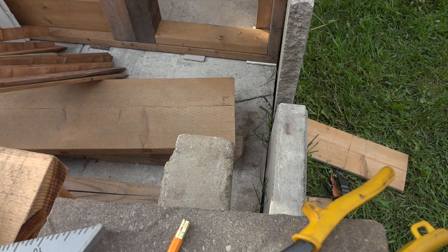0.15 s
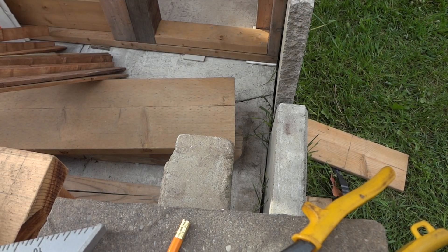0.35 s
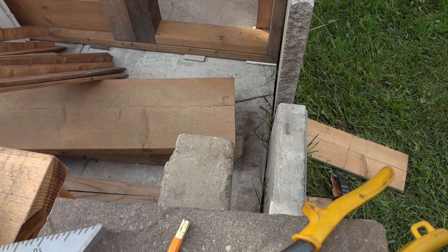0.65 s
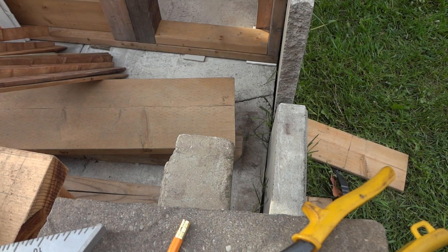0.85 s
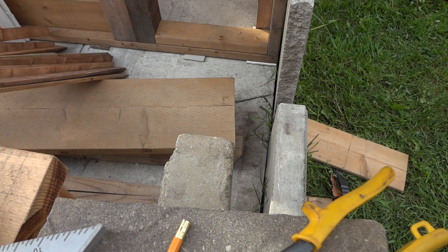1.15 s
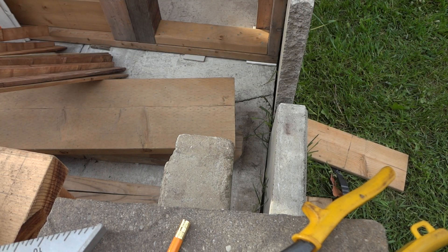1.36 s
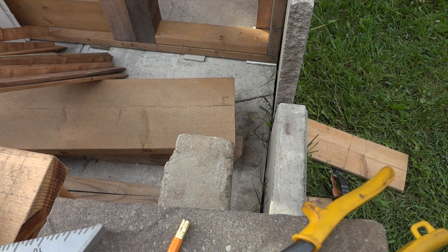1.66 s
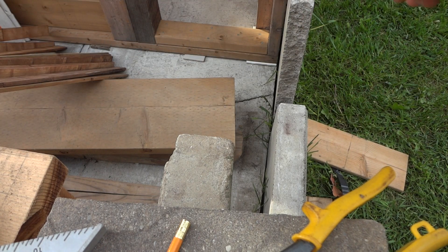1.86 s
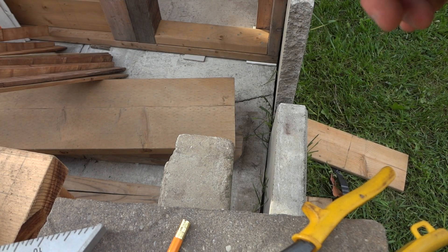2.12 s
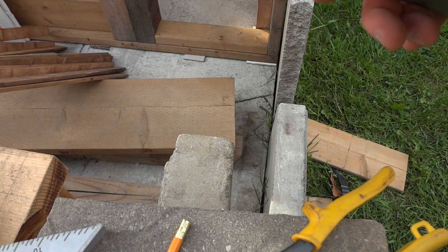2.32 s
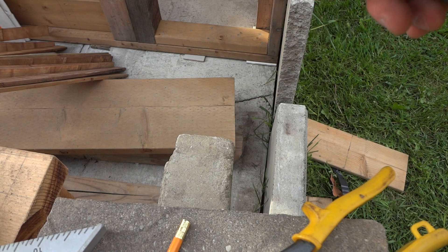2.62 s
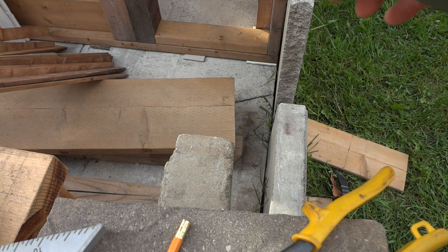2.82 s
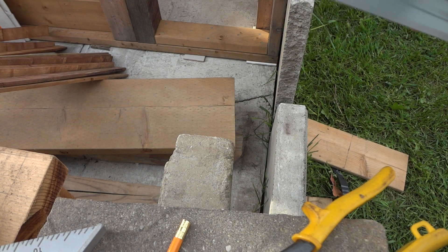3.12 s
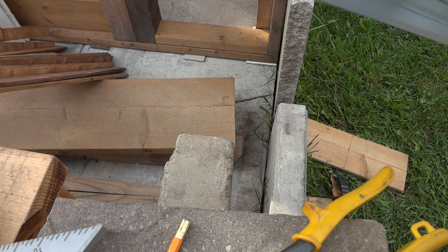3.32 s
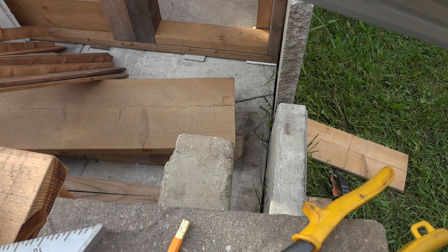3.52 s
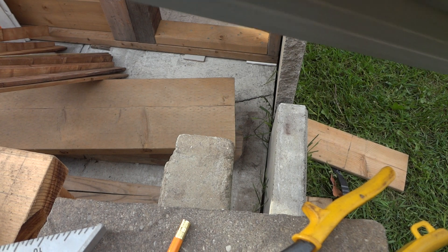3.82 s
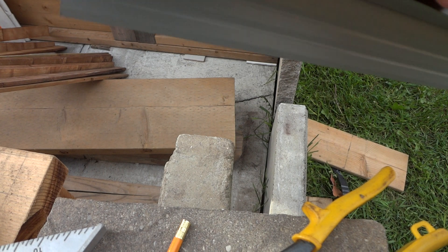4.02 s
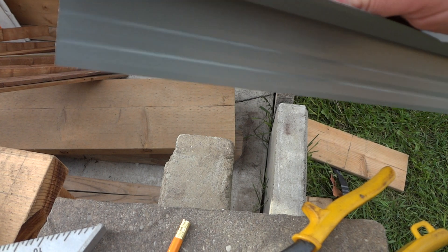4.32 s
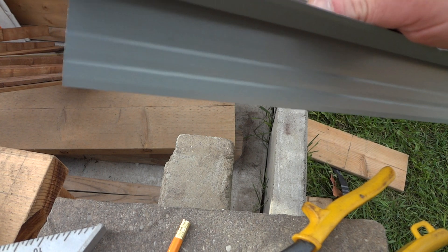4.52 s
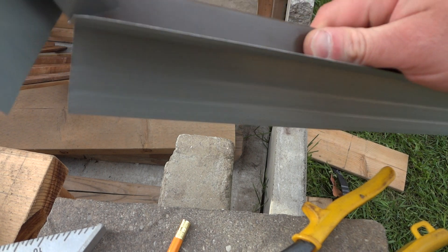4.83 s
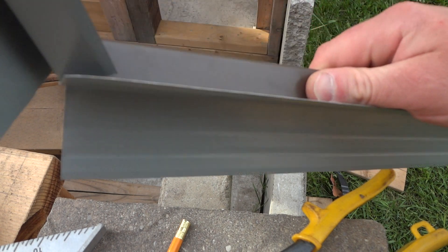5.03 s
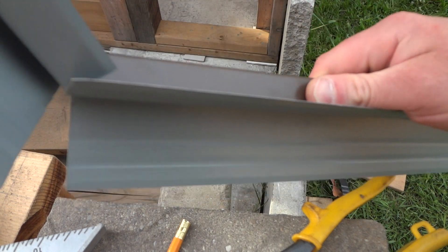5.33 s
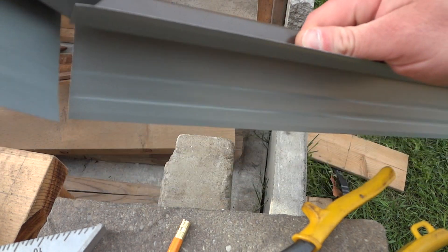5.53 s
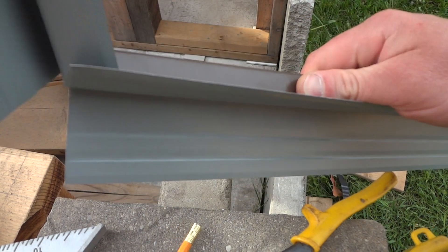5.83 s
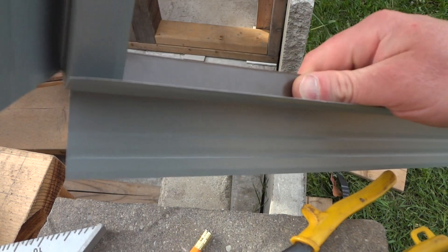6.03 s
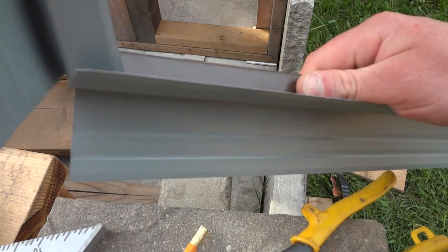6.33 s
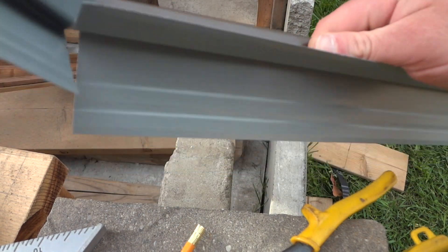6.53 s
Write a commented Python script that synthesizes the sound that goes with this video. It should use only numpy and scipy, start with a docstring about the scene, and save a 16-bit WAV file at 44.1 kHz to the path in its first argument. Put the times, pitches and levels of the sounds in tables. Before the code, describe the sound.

Hands shift a thin metal panel, then rub and knock a folded metal strip, with dry ticks and a hard late clank in a quiet yard.

```python
"""A quiet yard outdoors: close to a camera, hands lift a thin metal panel, then slide and knock a folded strip.
Edges that rub and bump push the sheets with a grainy force, and many close modes (ringing tones) answer.
A few lone tones and dry ticks join in, walls send a little sound back, and hiss and rumble lie behind it all."""
import sys
import numpy as np
from scipy import signal
from scipy.fft import rfft, irfft, next_fast_len
from scipy.io import wavfile
from scipy.ndimage import uniform_filter1d

SR = 44100
rng = np.random.default_rng(int(sys.argv[2]) if len(sys.argv) > 2 else 0)


def convert_level_to_amplitude(level_db):
    """Map a level in decibels to its linear amplitude factor."""
    exponent = np.asarray(level_db, float) / 20
    return 10 ** exponent


def wav_out(sig):
    """Save sig, one row per channel (or a flat mono array), as 16-bit PCM at SR to the path in sys.argv[1]."""
    wavfile.write(sys.argv[1], SR, np.round(np.clip(np.atleast_2d(sig).T, -1, 1) * 32767).astype(np.int16))


N = 293831  # length of the scene in samples

# In all tables t60 is the time a tone takes to fall by 60 dB.
# Sudden contacts: (start [s], contact lasts [s], vibration [dB], bass above vibration [dB],
# treble above vibration [dB])
KNOCKS = [(0.0, 0.005, -33, -14, -18), (.13, 0.02, -12, -13.5, -11.5), (0.472, 0.0031, -35, -19.5, -15),
          (0.609, 0.015, -28, -50, -20.5), (0.649, 0.034, -31, -22, -17), (0.739, 0.0091, -37, -27, -18),
          (1.033, 0.0075, -56.5, -27, -23), (1.238, 0.0047, -39.5, -25, -21),
          (1.257, 0.017, -20.5, -25.5, -10), (1.282, 0.015, -29, -16.5, -14),
          (1.463, .035, -46.5, -12.5, -17.5), (1.769, 0.032, -48, -14, -16), (1.889, 0.014, -44, -29, -17),
          (1.923, 0.017, -50, -16, -9.5), (2.053, 0.031, -35.5, -14, -13), (2.39, 0.005, -45, -30, -10),
          (3.336, .02, -63, -30, -1), (3.483, .004, -56.5, -3.5, -5), (3.507, 0.014, -47, -22, -11),
          (4.262, 0.024, -26.5, -16.5, -6), (4.478, 0.019, -35, -19.5, -8),
          (4.874, 0.0051, -50.5, -26, -15), (5.041, 0.06, -34.5, -11, -12.5), (5.143, 0.01, -30.5, -12, -8),
          (5.372, 0.027, -48, -28, -13), (5.663, 0.041, -38.5, -25, -15), (5.931, 0.0059, -44, -10, -14),
          (5.966, 0.039, -22, -15.5, 0), (6.064, 0.0073, -8.5, -13.5, -14), (6.635, 0.007, -54.5, -9, -14)]
# Edges sliding: (start [s], length [s], vibration [dB], bass above vibration [dB], treble above vibration [dB])
SLIDES = [(0.349, 0.12, -49, -31, 1), (0.454, 0.2, -39, -43, -7), (0.687, 0.072, -36.5, -20, -26),
          (1.105, 0.1, -54.5, -43, -18), (1.33, 0.11, -49.5, -11, -12), (1.511, 0.082, -50, -15, -19),
          (1.643, 0.15, -53.5, -23, -23), (1.78, 0.12, -51.5, -10.5, -8.5), (2.005, 0.051, -54, -12, -9),
          (2.09, 0.16, -49, -18, -13), (2.199, .045, -40.5, -22, -13.5), (2.235, 0.039, -42, -15, -8.5),
          (2.256, 0.17, -49.5, -24, -8), (2.718, 0.063, -51.5, -10, -11), (2.765, 0.099, -36, -23.5, -12),
          (2.834, 0.11, -39.5, -28, -12), (2.893, 0.14, -42, -34, -8), (2.971, 0.093, -35, -25, -2.5),
          (3.018, 0.13, -36, -22, -7.5), (3.088, 0.22, -47, -23, -7.5), (3.525, 0.097, -54.5, -12, -12),
          (4.084, 0.13, -54.5, -27, -2), (4.23, 0.062, -52, -27, -4), (4.273, 0.1, -35, -12, -3),
          (4.336, 0.1, -31.5, -22, -5), (4.496, 0.11, -49.5, -23, -10.5), (4.714, 0.13, -49, -16, -4.5),
          (5.006, 0.063, -48.5, -12, -12), (5.028, 0.13, -27, -16, -7.5), (5.421, 0.052, -49, -8, -12),
          (5.449, .03, -34.5, -9, -16), (5.463, 0.066, -36.5, -11, -14), (5.502, 0.055, -27, -7, -15.5),
          (5.676, 0.16, -29.5, -12, -10), (5.782, 0.087, -46, -3.5, -4), (5.972, .13, -10, -11.5, -8.5),
          (6.102, 0.13, -39.5, -4, -15.5), (6.217, 0.069, -32.5, -20, -12), (6.327, 0.085, -53.5, -8, -18)]
# The hands: (time [s], faint creak of holding [dB], damping by the grip [dB/s, sign ignored],
# extra level of the strongest modes [dB])
HANDS = [(0.0, -62, 97, -1.5), (.13, -41, 11, 8.5), (.45, -51.5, 200, -25), (.62, -50, 196, 3.5),
         (.75, -48, 150, 8), (1.0, -67, 203, -21), (1.26, -70, 223, 10), (1.6, -57.5, 198, -1),
         (1.95, -60, 146, -8), (2.06, -47, 72, -9.5), (2.42, -63.5, 102, -6.5), (2.6, -94, 200, -3.5),
         (3.1, -55.5, 189, -14.5), (3.7, -68.5, 200, -6), (4.25, -55.5, 289, -2), (5.2, -61, 231, -3),
         (5.9, -49.5, 273, -6), (5.98, -86, 93, -3), (6.25, -62, 193, -9.5), (6.66, -68, 188, 5)]
# The metal moves past the camera: (time [s], middle band left above right [dB], tilt within the bass [dB/octave],
# tilt within the middle [dB/octave], tilt within the treble [dB/octave]); flexing alters the first two tilts
METAL_PLACE = [(0.0, 0, -3, -4.5, -11), (.13, 0, -12, -3.5, -9), (.5, 3.5, -7, -4.5, 8),
               (.7, 2, 0, -9, -18), (1.26, 0.7, 28, -1, -9.5), (1.9, 1, -17, -2.2, -2.5),
               (2.25, 4.5, -14, 2, -5.5), (3.05, -1.5, -2, -3.5, -11), (3.6, 1.5, -8, 1.5, -12),
               (4.1, 2, -21, -0.5, 2.5), (4.8, 3.5, -15, -5.5, 0.5), (5.1, 5.5, -18, 1, -0.5),
               (5.7, 6, -3, -0.5, -4.5), (5.97, -1, -10.5, -4.5, 2.5), (6.12, -3.5, 3.5, -12, -8),
               (6.25, 1.5, -17, -10.5, 8), (6.66, 6, -4, -10, -5)]
# Strongest modes of each sheet, before the grip damps them: (frequency [Hz], level [dB], t60 [s])
PANEL_MODES = [(383, -19, .4), (450, -18, .4), (583, -13, .4), (662, -10, .5), (732, -4, .38),
               (824, -4, .4), (900, -10, .35), (1075, -15, .3), (1400, -8, .3), (1572, 2, .42),
               (1717, -7, .42), (1890, -3, .25), (2148, -7, .35), (2315, -1, .23), (2417, -5, .36),
               (2492, -11, .5), (2821, -4, .5), (2923, 1, .35), (3020, -5, .4), (3120, -5, .3),
               (3241, -2, .27), (3461, -8, .45), (3607, -8, .4), (3700, -7, .2), (3844, -8, .36),
               (5001, -14, .32), (5529, -14, .18), (6535, -20, .3), (6885, -16, .17), (8263, -19, .16)]
STRIP_MODES = [(322, -16, .7), (420, -19, .3), (520, -19, .3), (624, -15, .4), (690, -18, .3),
               (1049, -14, .25), (1410, -9, .22), (1578, -6, .2), (1749, -9, .2), (2120, -10, .3),
               (2227, -3, .2), (2288, -6, .22), (2321, -4, .22), (2574, -4, .22), (2700, -5, .17),
               (2930, -4, .17), (3284, -8, .16), (3640, -8, .18), (3700, -3, .18), (4750, -15, .15),
               (4960, -12, .17), (6080, -11, .15), (7440, -13, .14), (8250, -18, .14), (8530, -16, .14),
               (9930, -17, .16), (10900, -19, .14)]
# The crowd of weaker modes, before its overall level is set: (frequency [Hz], level per Hz [dB])
PANEL_CROWD = [(160, -58), (280, -29), (373, 2), (524, -58), (735, 5), (997, -3.5), (1570, 3), (1960, 1),
               (2940, 7.5), (4570, -9.5), (7100, -14), (7860, -18.5), (10100, -9.5), (16000, -24.5)]
STRIP_CROWD = [(160, -49), (280, -46), (343, -7.5), (580, -9), (710, -9), (947, -21), (1030, -12.5),
               (2060, -11), (2620, -6), (3670, -9.5), (4060, -18.5), (6980, -24), (11000, -20),
               (16000, -28.5)]
# Typical ring of the crowd, before random spread and grip: (frequency [Hz], t60 [s])
PANEL_CROWD_T60 = [(300, 0.21), (1500, 0.18), (4000, 0.06), (8000, 0.18), (16000, 0.027)]
STRIP_CROWD_T60 = [(300, 0.23), (1500, 0.091), (4000, 0.16), (8000, 0.19), (16000, 0.035)]
# Borders between bass, middle and treble: (lower [Hz], upper [Hz])
BAND_EDGES_HZ = (1200, 4500)
# Where the tilt of each band pivots: (bass [Hz], middle [Hz], treble [Hz])
BAND_MIDDLES_HZ = (600, 2500, 8000)
# How fast the chatter after a knock fades, as a multiple: (bass [x], middle [x], treble [x])
FADE_SHARES = (.8, 1, 1.16)
# Single modes that ring on alone after a touch: (start [s], frequency [Hz], level [dB], t60 [s])
LONE_RINGS = [(.15, 1578, -24, .45), (.425, 11300, -48, .08), (2.065, 1276, -38, .45),
              (2.065, 1325, -39, .3), (2.4, 5110, -47, .5), (2.4, 2620, -50, .4), (3.02, 4230, -42, .55),
              (3.07, 4150, -47, .5), (4.79, 8250, -58, .3), (5.39, 6750, -54, .08), (6.1, 5475, -48, .5),
              (6.1, 1276, -29, .65), (6.11, 1320, -38, .5)]
# Dry ticks and small pops that fall in pitch: (start [s], level [dB], starting pitch [Hz], length [s])
TICKS = [(2.738, -46, 2700, .005), (3.487, -42, 2600, .003), (3.512, -38, 3500, .001),
         (4.812, -34, 6500, .0004), (5.735, -27, 1800, .0012), (5.735, -53, 160, .03),
         (5.74, -34, 600, .02), (5.784, -28, 1500, .011), (5.786, -33, 520, .02), (5.844, -40, 1300, .012),
         (5.883, -37, 1500, .01), (5.888, -31, 6500, .0016), (5.9, -45, 950, .02)]
# The metal in the two microphone ports: (frequency [Hz], left above right [dB])
METAL_LEFT = [(60, -10), (130, -4), (290, 0), (640, 3.0), (1410, 6), (3100, 8), (6820, 6.5), (15000, -1.5)]
# Its timing between them: (frequency [Hz], left leads by [radians])
METAL_LEAD = [(0, -1.7), (340, 0.6), (1550, 0.92), (2240, 0.69), (6030, -0.67), (6980, -0.3), (7490, -0.56),
              (16200, -0.25)]
# Tone of the yard, before its overall level is set: (frequency [Hz], level per Hz [dB])
YARD_TONE = [(18, -52), (30, -33), (53, -11.5), (404, -11.5), (486, -5), (1130, -5.5), (1320, -8),
             (1910, -9), (2120, -11.5), (2750, -16.5), (3580, -14), (3980, -11.5), (4650, -20), (6900, -20),
             (8520, -23.5), (16000, -24)]
# How alike left and right are in the yard: (frequency [Hz], likeness [-1 to 1, clipped])
YARD_SAME = [(60, 1), (200, 0.44), (600, 0.15), (2000, 0.057), (5000, 0.36), (15000, 0.84)]
# Balance of the yard: (frequency [Hz], left above right [dB])
YARD_LEFT = [(60, -2), (300, 1), (1500, 2.5), (5000, 1.7), (15000, -0.5)]

SWAP_S = 1.99  # contacts that start before this moment ring the panel, later ones the strip
KNOCK_RISE_S = 0.0013
BLOW, BLOW_S = 1.02, 0.001  # extra push as a knock begins, and the time constant with which it dies away
# After a knock the edge chatters on, for less time in a firm grip.
CHATTER_FADE_DB_PER_S, CHATTER_FADE_PER_GRIP = 200, 1.93
SLIDE_PEAK, SLIDE_ROUNDNESS = 0.47, 1.63  # where in the slide the push is strongest, and how peaked it is
CREAK_BASS_DB, CREAK_TREBLE_DB = -9.5, -13
# A contact that flexes the sheet less sounds brighter: dB/octave of tilt for each dB of bass.
BASS_SLOPE, MIDDLE_SLOPE = -0.75, -0.37
YARD_DB = -57.5


def evened(x):
    """Scales a sound to an average strength (rms) of 1."""
    return x / np.sqrt(np.mean(x ** 2) + 1e-20)


def read(points, hz):
    """Reads a table along a logarithmic frequency axis."""
    f, value = np.transpose(points)
    return np.interp(np.log(hz + 1), np.log(f + 1), value)


def control(table, s):
    """Reads every column of a table at the times s."""
    at, *columns = np.transpose(table)
    return [np.interp(s, at, column) for column in columns]


def add(mix, s, sound):
    """Mixes in a sound that starts at s seconds."""
    part = mix[round(s * SR):][:len(sound)]
    part += sound[:len(part)]


def ring(hz, t60, seconds):
    """Modes swing as sines that die away, one in each row."""
    t = np.arange(int(seconds * SR), dtype=np.float32) / SR
    hz, t60 = np.float32(hz)[:, None], np.float32(t60)[:, None]
    return np.exp(-np.log(1000) * t / t60) * np.sin(2 * np.pi * hz * t)


def rubbing_force(coarse_db, grains_per_s, rattle, rattles_per_s):
    """Rubbing edges push in short clumps of noise, a few of them large, while the loose edge chatters."""
    grain_happens = rng.random(N) < grains_per_s / SR
    grains = convert_level_to_amplitude(coarse_db * np.minimum(rng.exponential(1, N), 4)) * grain_happens
    clumps = signal.lfilter([1], [1, -np.exp(-1 / (0.0014 * SR))], grains)
    rattles = rng.random(N) < rattles_per_s / SR
    chatter = signal.lfilter([1], [1, -np.exp(-1 / (0.0019 * SR))], rattles)
    return evened((0.6 + clumps) * (1 + rattle * chatter) * rng.standard_normal(N))


def knocks():
    """A knock starts with a hard blow, then its chatter loses treble first and bass last."""
    out = []
    for s, lasts_s, db, bass_db, treble_db in KNOCKS:
        t = np.arange(0, lasts_s + 0.22, 1 / SR)
        grip = abs(control(HANDS, s)[1])
        fade_db_per_s = CHATTER_FADE_DB_PER_S + CHATTER_FADE_PER_GRIP * grip
        fade_db = fade_db_per_s * np.maximum(t - lasts_s, 0)
        blow = np.minimum(t / KNOCK_RISE_S, 1) * (1 + BLOW * np.exp(-t / BLOW_S))
        strength = convert_level_to_amplitude(db - np.outer(FADE_SHARES, fade_db)) * blow
        out.append((s, strength, lasts_s, bass_db, treble_db))
    return out


def slides():
    """The push of a sliding edge swells and sinks once."""
    out = []
    for s, length_s, db, bass_db, treble_db in SLIDES:
        u = np.arange(0, length_s, 1 / SR) / length_s
        bent = u ** (np.log(0.5) / np.log(SLIDE_PEAK))  # moves the peak away from the middle
        swell = abs(np.sin(np.pi * bent)) ** SLIDE_ROUNDNESS
        out.append((s, [convert_level_to_amplitude(db) * swell] * 3, length_s / 2, bass_db, treble_db))
    return out


def creaks():
    """Holding hands creak all the time, at a new spot every 0.4 s, in overlapping swells."""
    out = []
    t = np.arange(0, 0.8, 1 / SR)
    for s in np.arange(0, N / SR, 0.4):
        swell = convert_level_to_amplitude(control(HANDS, s + t)[0]) * np.sin(np.pi * t / t[-1])
        out.append((s, [swell] * 3, 1, CREAK_BASS_DB, CREAK_TREBLE_DB))
    return out


def sheet(touched, modes, crowd, crowd_t60, crowd_db, spot_db, force):
    """Each contact touches another spot, so the modes of the sheet take other shares and signs of the force."""
    # 700 weaker modes, closest together at the low end
    crowd_hz = 280 + (np.arange(700) + rng.random(700)) ** 1.5 * 16000 / 700 ** 1.5
    spacing = np.gradient(crowd_hz).clip(1)
    weak_t60 = read(crowd_t60, crowd_hz) * rng.uniform(0.7, 1.3, 700)
    weak_height = convert_level_to_amplitude(read(crowd, crowd_hz) + crowd_db) * np.sqrt(spacing / weak_t60)
    strong_hz, strong_db, strong_t60 = np.transpose(modes)
    hz, t60 = np.r_[strong_hz, crowd_hz], np.r_[strong_t60, weak_t60]
    height = np.r_[convert_level_to_amplitude(strong_db), weak_height]
    band = np.searchsorted(BAND_EDGES_HZ, hz)  # 0 bass, 1 middle, 2 treble

    spot, sign = rng.standard_normal((len(touched), len(hz), 2)).T
    shares = (height[:, None] * convert_level_to_amplitude(spot_db * spot) * np.sign(sign)).T
    starts, bass = np.array([(c[0], c[3]) for c in touched]).T
    _, grips, clear_db = control(HANDS, starts)
    lefts_db, bass_slope, middle_slope, treble_slope = control(METAL_PLACE, starts)
    shares[:, :len(modes)] *= convert_level_to_amplitude(clear_db)[:, None]
    slopes = bass_slope + BASS_SLOPE * bass, middle_slope + MIDDLE_SLOPE * bass, treble_slope

    out = np.zeros((2, N))
    for k, seconds in enumerate((0.42, 0.4, 0.22)):  # longest ring computed in each band
        rings = ring(hz[band == k], t60[band == k], seconds)
        age = np.arange(rings.shape[1], dtype=np.float32) / SR
        octaves = np.log2(hz[band == k] / BAND_MIDDLES_HZ[k])
        coloured = shares[:, band == k] * convert_level_to_amplitude(np.outer(slopes[k], octaves))
        damping = convert_level_to_amplitude(-np.outer(abs(grips), age))
        bodies = np.float32(coloured) @ rings * damping
        for contact, left_db, body in zip(touched, lefts_db, bodies):
            s, strength, length_s, bass_db, treble_db = contact
            hold_s = np.sum(age * body ** 2) / np.sum(body ** 2)  # how long the energy stays in the sheet
            push = force[round(s * SR):][:len(strength[k])]
            push = np.r_[evened(push[:80]), push[80:]]  # the first contact is firm
            short_boost = np.sqrt(1 + hold_s / length_s)  # short pushes must be harder
            feed = strength[k] * convert_level_to_amplitude((bass_db, 0, treble_db)[k]) * short_boost
            response = np.float32(body / np.linalg.norm(body))
            sound = signal.fftconvolve(np.float32(push * feed), response)
            shift_db = left_db * (k == 1)  # only the middle band shifts sideways
            add(out[0], s, sound * convert_level_to_amplitude(shift_db / 4))
            add(out[1], s, sound * convert_level_to_amplitude(-shift_db * 3 / 4))
    return out


def lone_rings():
    """Single modes ring on after a touch, and their loudness wavers in the hand."""
    out = np.zeros(N)
    onset = 1 - np.exp(-np.arange(SR) / 120)
    for s, hz, db, t60 in LONE_RINGS:
        waver = 1 + 0.35 * evened(uniform_filter1d(rng.standard_normal(SR), 500))
        add(out, s, convert_level_to_amplitude(db) * ring([hz], [t60], 1)[0] * onset * waver)
    return out


def ticks():
    """Each tick is a short, slightly rough sine that falls in pitch by about a third."""
    out = np.zeros(N)
    for s, db, hz, length_s in TICKS:
        u = np.linspace(0, 1, round(length_s * SR))
        falling = np.sin(2 * np.pi * np.cumsum(hz * (1 - 0.35 * u)) / SR)
        rough = 1 + 0.3 * evened(uniform_filter1d(rng.standard_normal(len(u)), 60))
        swell = np.sin(np.pi * u ** 0.7) ** 2
        add(out, s, convert_level_to_amplitude(db) * falling * rough * swell)
    return out


def ports(sheets, pops):
    """The metal is on the left: two microphone ports differ in level and phase, and walls send a little back."""
    size = next_fast_len(N + SR)
    hz = np.fft.rfftfreq(size, 1 / SR)
    left = convert_level_to_amplitude(read(METAL_LEFT, hz) / 2) * np.exp(0.5j * read(METAL_LEAD, hz))
    pair = np.array([left, 1 / left]) / abs(left + 1 / left) * 2
    thin = 1 / np.sqrt(1 + (270 / (hz + 1)) ** 8)  # thin sheets radiate no deep bass
    t = np.arange(6000) / SR
    walls = rng.standard_normal((2, 6000)) * convert_level_to_amplitude(-60 * t / 0.023) * (t > 0.004)
    walls = rfft(walls / np.linalg.norm(walls[0]), size)
    back = convert_level_to_amplitude(-18) * walls / (1 + (hz / 5000) ** 2)  # the walls return less treble
    metal = rfft(sheets, size) * thin + rfft(pops, size)
    return irfft(metal * pair * (1 + back), size)[:, :N]


def yard():
    """Distant hiss and rumble: random noise shaped by frequency, with slow drifting patches."""
    frames, hz = N // 256 + 5, np.fft.rfftfreq(1024, 1 / SR)
    a, b, c, d, patches = rng.standard_normal((frames, 513, 5)).T
    patches = evened(uniform_filter1d(uniform_filter1d(patches, 12, 0), 30, 1))
    same = np.clip(read(YARD_SAME, hz), -1, 1)[:, None]
    left = a + 1j * b
    right = same * left + np.sqrt(1 - same ** 2) * (c + 1j * d)
    z = np.array([left, right]) * convert_level_to_amplitude(read(YARD_TONE, hz)[:, None] + 1.24 * patches)
    z *= convert_level_to_amplitude(np.outer([0.5, -0.5], read(YARD_LEFT, hz)))[:, :, None]
    noise = signal.istft(z, nperseg=1024, noverlap=768)[1][:, :N]
    return convert_level_to_amplitude(YARD_DB) * evened(noise)


def scene():
    """Panel and strip share one rubbing force; lone rings, ticks and the yard join them."""
    force = np.tile(rubbing_force(3.75, 1200, 1.18, 110), 2)
    # each contact: (start s, push over time in bass, middle and treble, length s, bass dB, treble dB)
    touched = knocks() + slides() + creaks()
    early = [c for c in touched if c[0] < SWAP_S]
    late = [c for c in touched if c[0] >= SWAP_S]
    panel = sheet(early, PANEL_MODES, PANEL_CROWD, PANEL_CROWD_T60, -25.5, 0.53, force)
    strip = sheet(late, STRIP_MODES, STRIP_CROWD, STRIP_CROWD_T60, -31.0, 0.87, force)
    return ports(panel + strip, lone_rings() + ticks()) + yard()


def band_limit(x):
    """A steep low-pass at the top of the band."""
    return signal.sosfilt(signal.butter(12, 16600, fs=SR, output="sos"), x)


def record(dry):
    """A quick limiter holds the loudest clanks down."""
    peak_db = 20 * np.log10(abs(dry).max(0) + 1e-9)
    fall = np.arange(N) * 108.0 / SR  # recovers this many dB a second
    held_db = np.maximum.accumulate(peak_db + fall) - fall
    over_db = np.maximum(held_db + 8, 0)  # works above -8 dB
    mix = dry / convert_level_to_amplitude(0.74 * uniform_filter1d(over_db, 24))
    return band_limit(mix)


dry = scene()
out = record(dry)
wav_out(out)
```